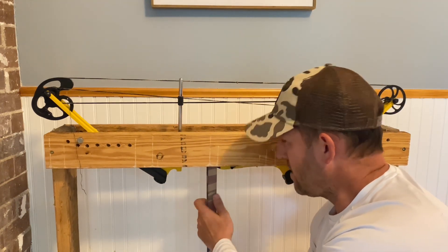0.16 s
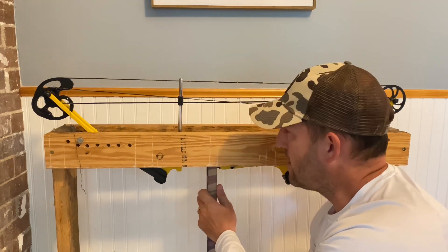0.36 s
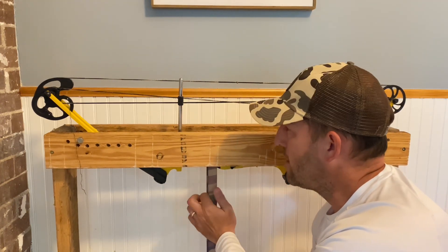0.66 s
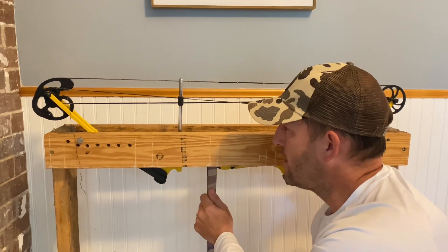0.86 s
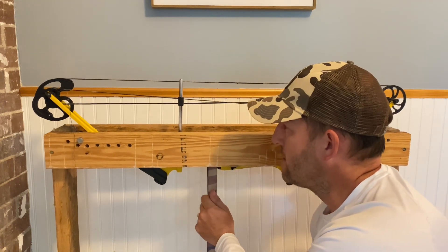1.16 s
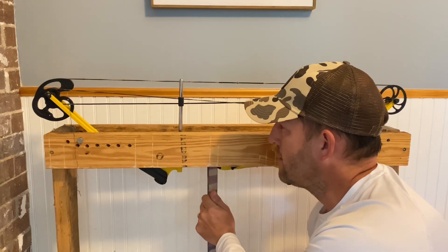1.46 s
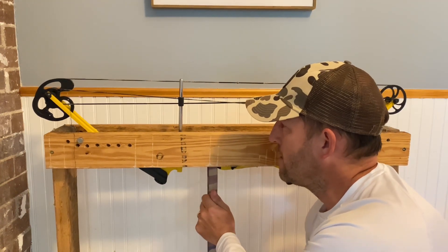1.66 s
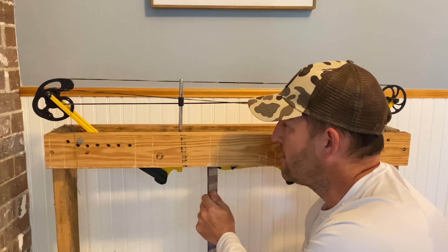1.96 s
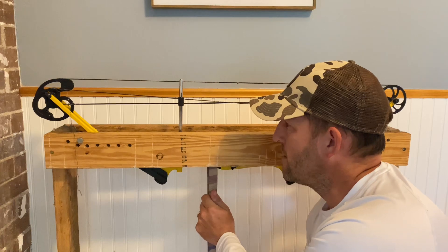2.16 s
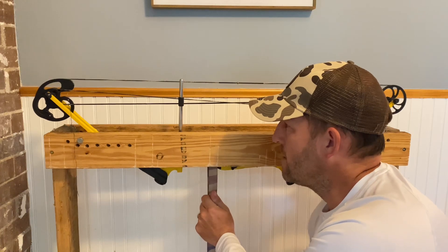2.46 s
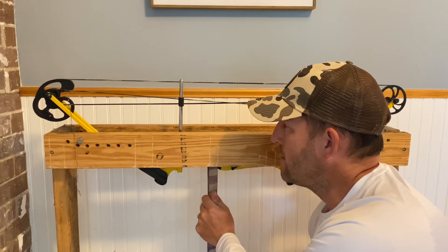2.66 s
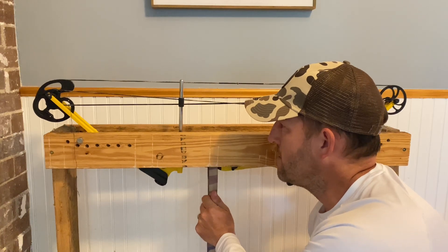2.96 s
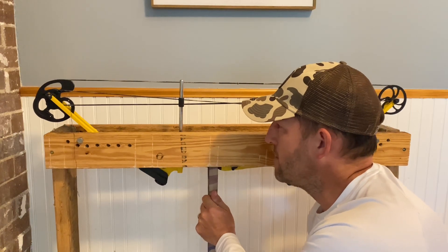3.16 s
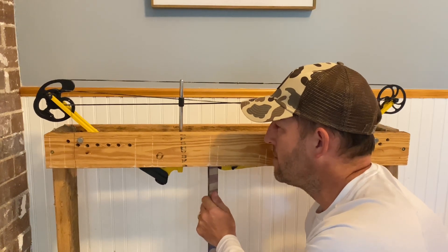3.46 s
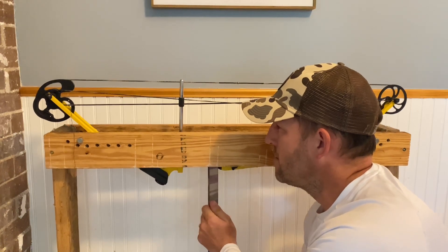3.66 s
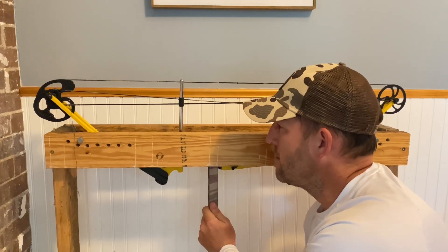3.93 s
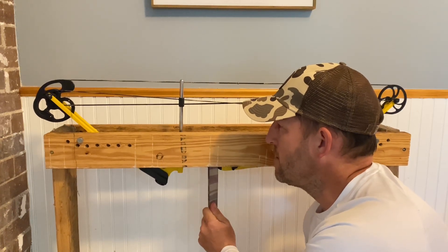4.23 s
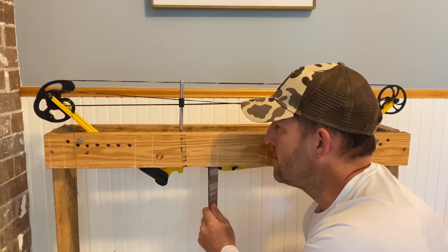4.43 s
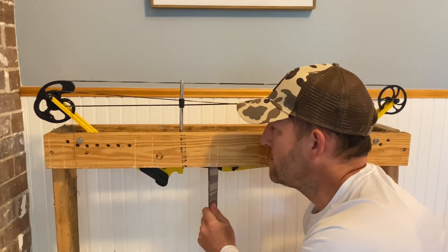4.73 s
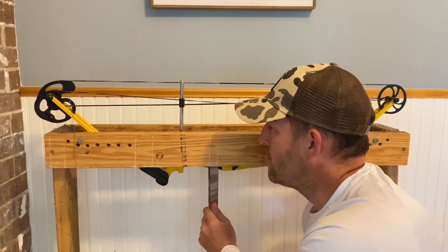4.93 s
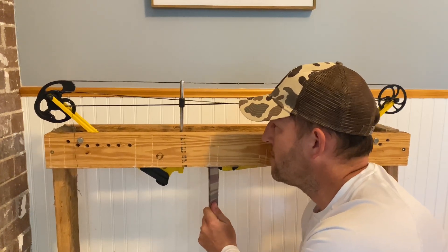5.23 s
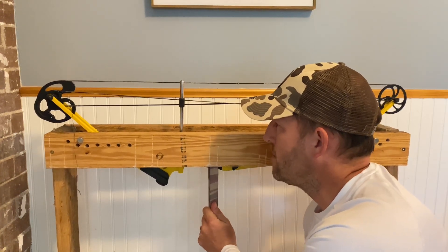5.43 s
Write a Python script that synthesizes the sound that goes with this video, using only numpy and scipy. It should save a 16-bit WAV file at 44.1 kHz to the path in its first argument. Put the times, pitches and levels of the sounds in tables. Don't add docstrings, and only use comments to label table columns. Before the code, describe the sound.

After a nearly quiet start with a faint squeak, steel clicks begin around one second and continue irregularly to the end, the hardest near two and just before four seconds. A pure chirp rings near five seconds, then timber hums and groans. Soft strap creaks and fabric rustle lie beneath. Indoors, close stereo pickup, short reflections, quiet appliance hum.

```python
import sys
import numpy as np
from scipy import signal
from scipy.fft import rfft, irfft, next_fast_len
from scipy.io import wavfile
from scipy.ndimage import uniform_filter1d, map_coordinates

SR = 44100
rng = np.random.default_rng(int(sys.argv[2]) if len(sys.argv) > 2 else 0)


def store_pcm(level_fs):
    pcm = np.round(np.clip(level_fs, -1, 1) * 32767).astype(np.int16)
    wavfile.write(sys.argv[1], SR, np.atleast_2d(pcm).T)


def decibels_to_gain(level_db):
    exponent = np.asarray(level_db, float) / 20
    return 10 ** exponent


N = 246519
TAIL = 20480
BLOCK = 4096
TOP_HZ = 15900

# (time [s], peak [dB], beam knock [dB], loudest ring [Hz], brightness [dB per octave])
PAWL_DROPS = [(0.8751, -32, -1.5, 4980, -5), (1.1724, -20, -12.5, 3540, 1),
              (1.1782, -17, -11.5, 5170, -6.5), (1.5419, -31.5, -7.5, 5185, -5.5),
              (1.8518, -39, -24, 4520, -7), (1.937, -5, -21.5, 5630, 1), (2.3709, -53, -4, 5330, -7),
              (2.8728, -14.5, -17, 4980, -4), (3.2178, -27, -13.5, 6900, -1.5),
              (3.6661, -4.5, -18, 6340, 0), (3.8365, -29.5, -19.5, 5690, -3), (3.8767, -35, -9, 5490, -3.5),
              (3.908, -39.5, -5, 7540, -1.5), (4.2192, -46, -6, 6260, -5.5), (4.6113, -22, -13, 5360, -2),
              (4.6215, -16, -14.5, 4960, -7.5), (5.1918, -11, -18, 6520, -1.5)]
# (time [s], peak [dB], beam knock [dB], loudest ring [Hz], brightness [dB per octave])
PAWL_DRAGS = [(.385, -50, -4.5, 4500, -10.5), (0.409, -42.5, -5, 3500, -1), (0.4294, -41, -12.5, 7760, -2),
              (0.7547, -50.5, -13, 5400, 2), (0.8505, -50.5, -11, 6410, 4), (0.9742, -46.5, 5, 4330, -7.5),
              (1.161, -56, -12, 5530, -9), (1.383, -36, -23, 7000, 4), (1.3897, -22, -15, 6470, 0.5),
              (1.773, -49.5, -10, 9700, -0.5), (1.787, -57, -8, 14300, -4),
              (2.1246, -40.5, -3.5, 6700, -6.5), (2.7935, -47.5, -7.5, 1580, -7),
              (3.2084, -35, -22.5, 6950, 0), (3.4785, -55.5, 10, 5220, -3), (3.5094, -51.5, 7.5, 2190, -2),
              (3.6331, -51.5, 9, 6600, -7), (3.654, -32.5, -7.5, 3500, -5), (4.463, -47.5, -0.5, 2220, -11),
              (4.915, -46, -9.5, 5190, -1.5), (4.929, -26.5, -12, 5700, -3.5),
              (5.1507, -49.5, 4, 5430, -6.5), (5.187, -35.5, -6.5, 6000, -9.5), (5.3956, -38, -4, 4660, -5)]
# (frequency [Hz], level [dB per Hz])
STEEL_COLOUR = [(760, -35.5), (1300, -20.5), (2330, -14.5), (5950, -3.5), (7280, -5.5), (10100, -5),
                (11100, -5), (13200, -7.5), (14700, -2.5), (16500, -32.5)]
# (frequency [Hz], width [Hz], level [dB])
TOOTH_RINGS = [(3500, 110, -11), (5212, 450, 13), (6110, 230, -6.5), (6470, 220, 11), (7940, 180, -0.5),
               (9850, 1100, 12), (12060, 130, -3.5)]
# (frequency [Hz], width [Hz], level [dB])
BEAM_RINGS = [(215, 77, -1), (371, 84, 7), (548, 60, -1), (748, 62, -3.5), (964, 63, -5.5), (1120, 87, -4),
              (1437, 160, -15.5)]
# (time of peak [s], peak [dB], pitch [Hz], time to fall 60 dB [s], octave [dB])
SQUEAKS = [
    (0.434, -39.5, 7710, .015, -11),
    (1.392, -32.5, 6660, 0.033, -4),
    (1.73, -63, 5200, 0.092, -26),
    (1.757, -59, 5150, 0.12, -22),
    (1.774, -39, 4790, 0.068, -17),
    (1.787, -25, 4804, .03, -17),
    (1.811, -35.5, 4800, 0.18, -16),
    (3.214, -33, 6956, 0.15, -5.5),
    (4.926, -18.5, 5103, 0.056, -26.5),
]
# (time [s], peak [dB], pitch [Hz])
BEAM_FLEXES = [(1.004, -35.5, 175), (1.183, -34, 215), (1.403, -38, 215), (1.545, -27.5, 143),
               (1.63, -33.5, 145), (1.752, -28, 158.4), (1.79, -38, 153), (1.841, -32.5, 156.6),
               (2.224, -28.5, 140), (2.882, -62, 276.3), (3.231, -40, 144), (3.435, -38.5, 215),
               (3.463, -36, 104), (3.699, -28, 162), (3.855, -35, 217.5), (3.898, -43.5, 220),
               (4.246, -36.5, 97), (4.632, -30, 115), (4.936, -31.5, 192), (5.008, -32, 240),
               (5.062, -39.5, 219), (5.149, -27, 206), (5.377, -31.5, 222), (5.418, -35, 133)]
# (time [s], peak [dB], first pitch [Hz], last pitch [Hz], length [s])
HUMS = [
    (.37, -50, 160, 149, 0.11),
    (.43, -47.5, 157, 150, 0.075),
    (1.16, -41, 960, 930, 0.066),
    (1.22, -51.5, 1120, 1180, 0.21),
    (5.7, -57, 1430, 1450, .08),
    (3.47, -43, 135.7, 171, 0.034),
    (3.505, -28, 174, 218, 0.036),
    (3.46, -45, 386, 396, 0.1),
    (3.661, -36.5, 57.5, 50, 0.11),
    (5.186, -29.5, 248, 214, 0.075),
]
# (time [s], effort [dB])
EFFORT = [(0, 2.5), (.2, 4.5), (.7, -1), (.87, 4), (1.01, 10.5), (1.25, -0.5), (1.5, 8.5), (1.75, 7),
          (2.2, 5), (2.6, -1), (3.28, 2), (3.44, 7.5), (3.71, 12.5), (4.05, 1), (4.75, -0.5), (5.1, 15.5),
          (5.29, 13.5), (5.46, 1.5)]
# (frequency [Hz], level [dB per Hz])
SWAY_COLOUR = [(20, -48.5), (40, -15.5), (60, 16.5), (85, 6), (130, -50)]
# (frequency [Hz], level [dB per Hz])
GROAN_COLOUR = [(60, -28), (110, 3), (200, -5), (400, -9.5), (600, -18.5), (1200, -50)]
# (frequency [Hz], level [dB per Hz])
WEBBING_COLOUR = [(300, -30.5), (550, 0.5), (800, 2.5), (1300, -5.5), (2000, -13), (4000, -37)]
# (time [s], peak [dB], time to fall 10 dB either side [s])
BRUSHES = [(.02, -64, 0.2), (.16, -64.5, .1), (0.434, -62, 0.09), (.574, -73.5, 0.1), (.77, -60.5, 0.03),
           (0.885, -58, 0.037), (.974, -59, 0), (1.4, -70, 0.1), (1.971, -59, 0.0847), (2.958, -71, 0.09),
           (3.51, -64, .06), (3.819, -66.5, .06), (4.9, -67.5, 0.23), (5.25, -52.5, 0.0748)]
# (frequency [Hz], level [dB per Hz])
CLOTH_COLOUR = [(500, -26.5), (1500, 8), (4000, 2.5), (7500, -4.5), (12000, -12), (14500, -12),
                (16500, -23.5)]
# (frequency [Hz], level [dB per Hz])
HOUSE_COLOUR = [(15, -51), (25, -21.5), (64, 5), (87, -19.5), (242, -19), (263, -27), (326, -3.5),
                (384, -26), (1070, -35.5), (16000, -75)]
# (frequency [Hz], time to fall 60 dB [s])
WALL_ECHO = [(100, .5), (400, 0.34), (1000, 0.46), (2800, 0.36), (7000, .31), (15000, 0.23)]
# (frequency [Hz], likeness [0 to 1])
LIKENESS = [(60, 1), (130, .9), (290, 0.51), (640, 0.25), (1400, 0.12), (3100, 0.37), (5200, 0.27),
            (6500, 0.73), (8000, 1)]
# (frequency [Hz], gain on the left and loss on the right [dB])
LEFTWARD = [(130, -1.6), (500, 0.5), (2000, 1.3), (4500, 1.8), (6500, 1.6), (9000, 0)]
# (frequency [Hz], phase lead [radians])
LEFT_LEAD = [(0, 0), (1200, .4), (5000, .5), (5900, 1.1), (7150, 0), (9050, -np.pi), (15400, -4 * np.pi),
             (17500, -5 * np.pi)]


def unit(x):
    return x / np.sqrt(np.mean(x ** 2, -1, keepdims=True) + 1e-20)


def along(points, hz):
    f, value = np.transpose(points)
    return np.interp(np.log(hz + 1), np.log(f + 1), value)


def filtered(x, response):
    size = next_fast_len(x.shape[-1] + 4096)
    spectrum = rfft(x, size) * response(np.fft.rfftfreq(size, 1 / SR))
    return irfft(spectrum, size)[..., :x.shape[-1]]


def resonances(modes):
    def response(f):
        total = 0
        for k, (centre, width, db) in enumerate(modes):
            ring = 1j * f * width / (centre * centre - f * f + 1j * f * width)
            total = total + (-1) ** k * decibels_to_gain(db) * ring
        return total
    return response


def wobble(rate):
    knots = rng.standard_normal(int(N * rate / SR) + 4)
    return map_coordinates(knots, [np.arange(N) * rate / SR])


def swell(t, rise, t60):
    shape = (1 - np.exp(-t / np.abs(rise))) ** 2 * decibels_to_gain(-60 * t / np.abs(t60))
    return shape / shape.max(-1, keepdims=True)


def pawl(rows, rise, rattle_t60):
    s, db, knock_db, ring_hz, bright_db = np.transpose(rows)[:, :, None]
    t = np.arange(BLOCK) / SR
    loudest_ring = resonances([(ring_hz, 0.09 * ring_hz, -1.5 - 0.22 * db)])
    teeth = resonances(TOOTH_RINGS)

    def steel_colour(hz):
        tilt_db = bright_db * np.log2((hz + 100) / 6000)
        rings = 0.87 + 0.5 * teeth(hz) + loudest_ring(hz)
        return decibels_to_gain(along(STEEL_COLOUR, hz) + tilt_db) * rings

    spikes = rng.standard_normal((len(s), BLOCK)) * decibels_to_gain(6.08 * rng.standard_normal((len(s), BLOCK)))
    steel = filtered(spikes * swell(t, rise, rattle_t60), steel_colour)

    spread_db = 3.1 * rng.standard_normal((len(s), len(BEAM_RINGS), 1))
    beam_colour = resonances([(c, w, level + spread_db[:, k]) for k, (c, w, level) in enumerate(BEAM_RINGS)])
    push = rng.standard_normal((len(s), BLOCK)) * swell(t, rise=0.0069, t60=0.11)
    wood = filtered(push, beam_colour)

    steel = decibels_to_gain(db + 1) * steel / np.abs(steel).max(-1, keepdims=True)
    wood = decibels_to_gain(db + knock_db) * wood / np.abs(wood).max(-1, keepdims=True)

    single_blow = np.eye(1, BLOCK, round(2 * rise * SR) + 40)
    even_steel = unit(filtered(single_blow, steel_colour)) * steel.std(-1, keepdims=True)
    even_wood = unit(filtered(single_blow, beam_colour)) * wood.std(-1, keepdims=True)
    direct = steel + wood
    radiated = 0.48 * direct + 0.85 * (even_steel + even_wood)
    return s[:, 0] - rise, direct, radiated


def axle():
    s, db, hz, t60, octave_db = np.transpose(SQUEAKS)[:, :, None]
    t = np.arange(BLOCK) / SR - 0.04
    rise_s, sag = 0.022, 0.47

    def chatter(rate):
        return wobble(rate)[:len(s) * BLOCK].reshape(len(s), BLOCK)

    pitch = hz * (1 - sag * t + 0.012 * chatter(400))
    phase = 2 * np.pi * np.cumsum(pitch, 1) / SR
    fall_db = 60 * np.maximum(-t / rise_s, t / t60)
    level = uniform_filter1d(decibels_to_gain(db - fall_db + 2 * chatter(200.5)), size=60)
    twelfth = decibels_to_gain(octave_db - 6.5) * (3 * hz < TOP_HZ)
    whistle = np.sin(phase) + decibels_to_gain(octave_db) * np.sin(2 * phase) + twelfth * np.sin(3 * phase)
    calls = level * whistle
    return s[:, 0] + t[0], calls, calls


def beams():
    s, db, hz = np.transpose(BEAM_FLEXES)[:, :, None]
    t = np.arange(2 * BLOCK) / SR
    phase = 2 * np.pi * (hz * t + rng.random(s.shape))
    wave = np.sin(phase) + decibels_to_gain(-19) * np.sin(2 * phase)
    tone = decibels_to_gain(db - 5.5) * wave * swell(t, rise=0.0036, t60=0.11)
    return s[:, 0], tone, tone


def hums():
    s, db, first_hz, last_hz, length = np.transpose(HUMS)[:, :, None]
    progress = np.clip(np.arange(3 * BLOCK) / SR / length, 0, 1)
    pitch = first_hz + (last_hz - first_hz) * progress
    flutter_db = 1.5 * wobble(55)[:progress.size].reshape(progress.shape)
    level = decibels_to_gain(db + flutter_db) * np.sin(np.pi * progress)
    tone = level * np.sin(2 * np.pi * np.cumsum(pitch, 1) / SR)
    return s[:, 0], tone, tone


def stereo(pair):
    def turn(hz):
        return np.arccos(np.clip(along(LIKENESS, hz), -1, 1)) / 2

    mid = filtered(pair[..., 0, :], lambda hz: np.cos(turn(hz)))
    side = filtered(pair[..., 1, :], lambda hz: np.sin(turn(hz)))
    return np.stack([mid + side, mid - side], -2)


def room(times, direct, radiated, wet_db):
    noise = rng.standard_normal((len(direct), 2, TAIL))
    hz, t, z = signal.stft(noise, SR, nperseg=256)
    fading = z * decibels_to_gain(-60 * t / along(WALL_ECHO, hz)[:, None])
    tail = signal.istft(fading, SR, nperseg=256)[1][..., :TAIL]
    build_up = 1 - np.exp(-np.arange(TAIL) / SR / 0.0013)
    tail = unit(stereo(tail * build_up)) / np.sqrt(TAIL)
    heard = signal.fftconvolve(radiated[:, None], decibels_to_gain(wet_db) * tail, axes=2)
    heard[..., :direct.shape[1]] += direct[:, None]
    out = np.zeros((2, N + 2 * TAIL))
    for s, pair in zip(times, heard):
        start = round(s * SR)
        out[:, start:start + pair.shape[1]] += pair
    return out[:, :N]


def rush(spectrum, lumps_db, rate):
    noise = filtered(rng.standard_normal((2, N)), lambda hz: decibels_to_gain(along(spectrum, hz)))
    return unit(stereo(noise) * decibels_to_gain(lumps_db * wobble(rate)))


def frame(effort_db):
    sway = decibels_to_gain(-59.5 + 0.8 * effort_db) * rush(SWAY_COLOUR, lumps_db=-0.5, rate=13)
    groan = decibels_to_gain(-59.5 + 1.044 * effort_db) * rush(GROAN_COLOUR, lumps_db=4.0, rate=25)
    return sway + groan


def fabric(t, effort_db):
    rustle = decibels_to_gain(-87)
    for s, db, fall in BRUSHES:
        rustle = rustle + decibels_to_gain(db - 10 * np.abs(t - s) / fall)
    creak = decibels_to_gain(-74 + 0.44 * effort_db) + decibels_to_gain(-1.5) * rustle
    webbing = creak * rush(WEBBING_COLOUR, lumps_db=2.5, rate=60)
    return webbing + rustle * rush(CLOTH_COLOUR, lumps_db=1.8, rate=34)


def house(t):
    mains_hz, mains_db = 60.7, -61
    level = decibels_to_gain(mains_db + 1.5 * wobble(6))
    mains = level * np.sin(2 * np.pi * mains_hz * t + 0.6 * wobble(5.5))
    return mains + decibels_to_gain(-60) * rush(HOUSE_COLOUR, lumps_db=5.5, rate=5)


def scene():
    drops = room(*pawl(PAWL_DROPS, rise=0.0004, rattle_t60=0.023), wet_db=0.0)
    drags = room(*pawl(PAWL_DRAGS, rise=0.004, rattle_t60=0.034), wet_db=1.0)
    squeaks = room(*axle(), wet_db=-5.5)
    left_right = np.array([[1], [-1]])
    ratchet = filtered(drops + drags + squeaks, lambda hz: decibels_to_gain(along(LEFTWARD, hz) * left_right))
    timber = room(*beams(), wet_db=-4.5) + room(*hums(), wet_db=-10.5)
    t = np.arange(N) / SR
    effort_db = np.interp(t, *np.transpose(EFFORT))
    return ratchet + timber + frame(effort_db) + fabric(t, effort_db) + house(t)


def roll_off(x):
    return signal.sosfilt(signal.butter(12, 16980, fs=SR, output="sos"), x)


def record(dry):
    f, lead = np.transpose(LEFT_LEAD)
    left_right = np.array([[1], [-1]])

    def port_response(hz):
        turn = np.exp(0.5j * np.interp(hz, f, lead) * left_right)
        return turn / (1 + (hz / TOP_HZ) ** 50)

    return roll_off(filtered(dry, port_response))


dry = scene()
out = record(dry)
store_pcm(out)
```